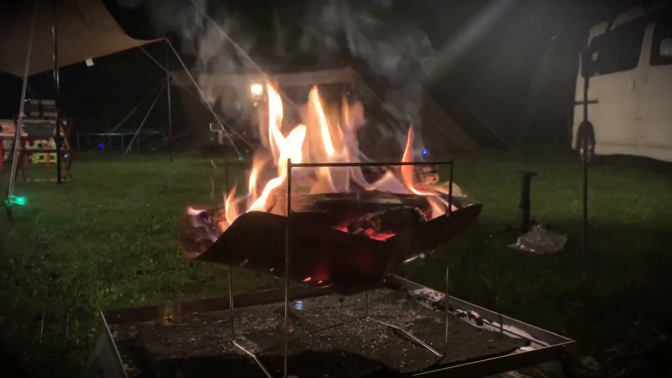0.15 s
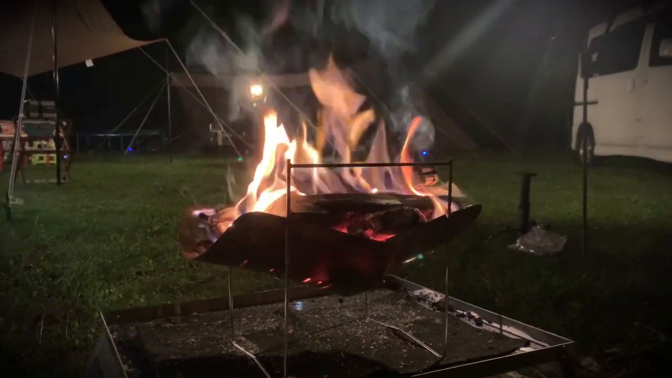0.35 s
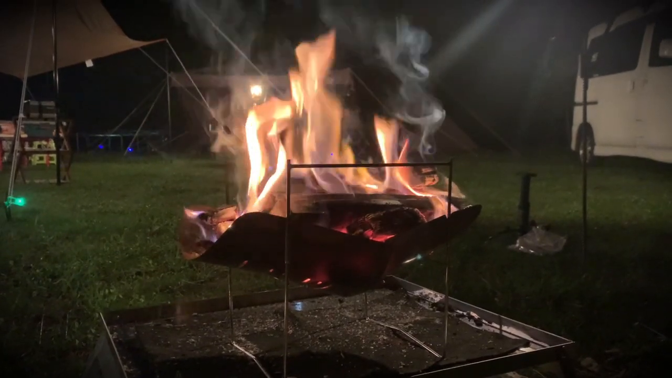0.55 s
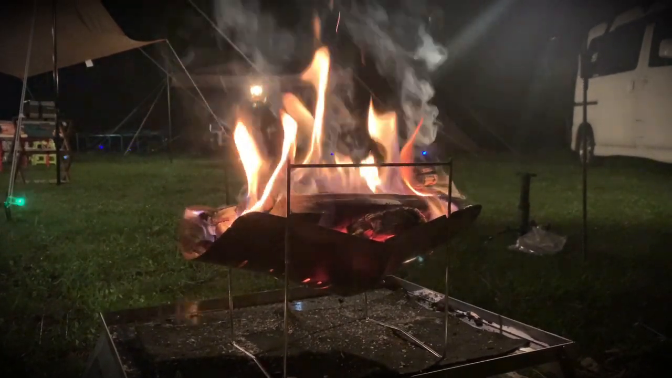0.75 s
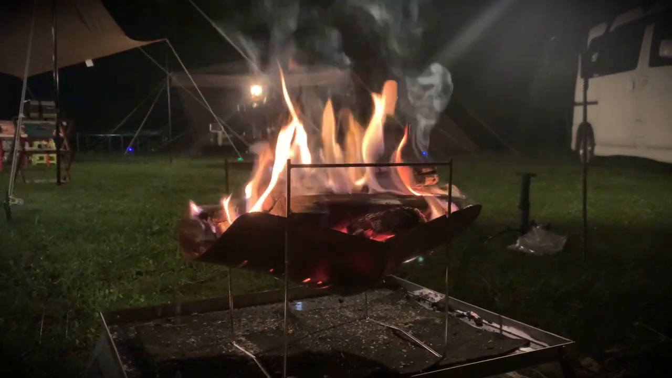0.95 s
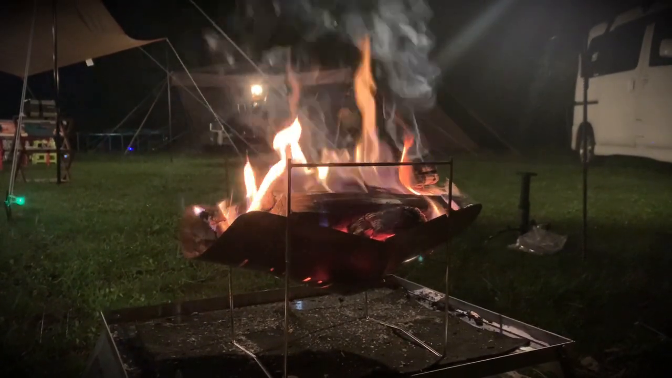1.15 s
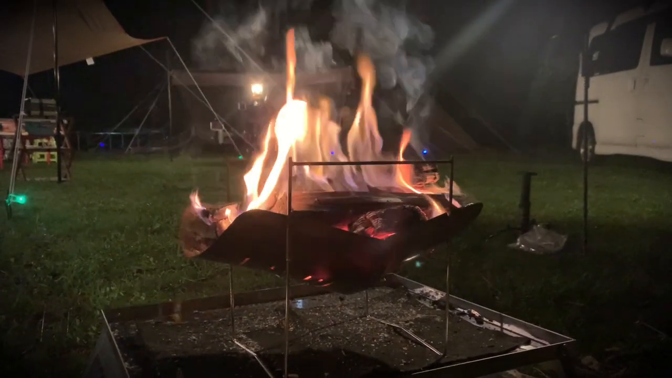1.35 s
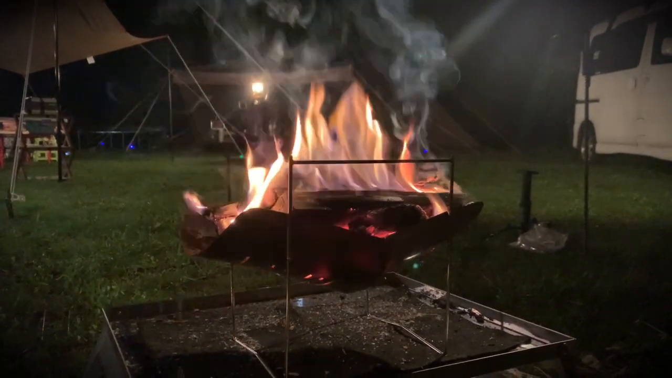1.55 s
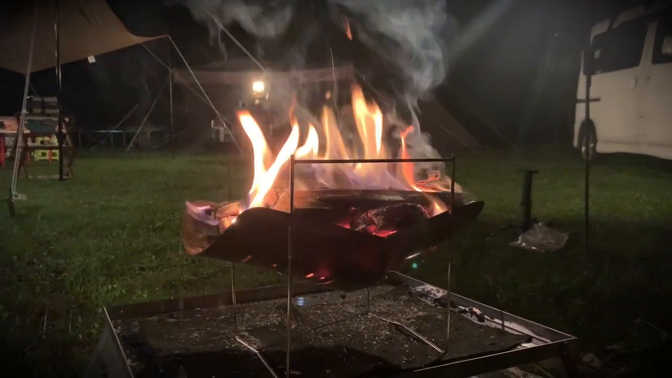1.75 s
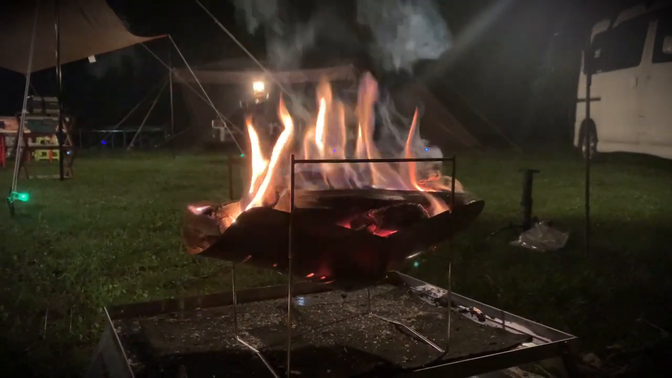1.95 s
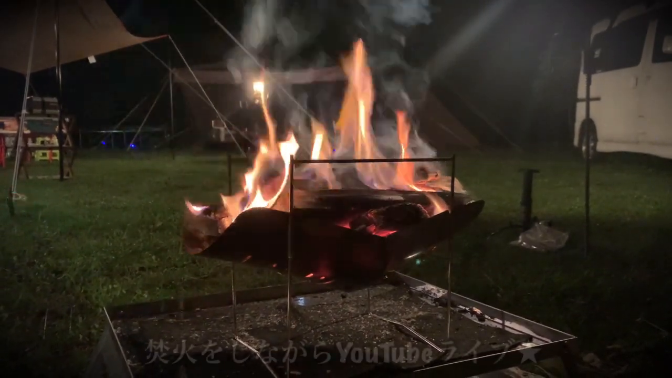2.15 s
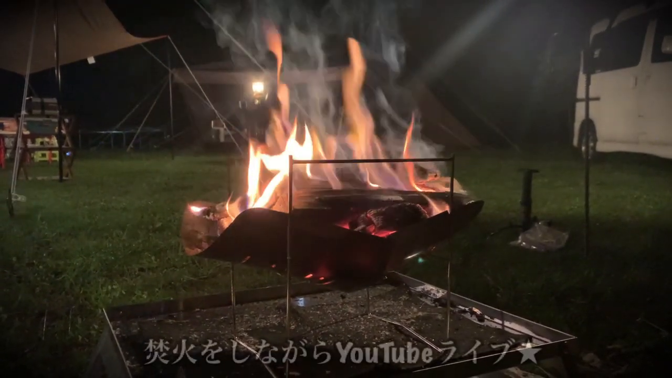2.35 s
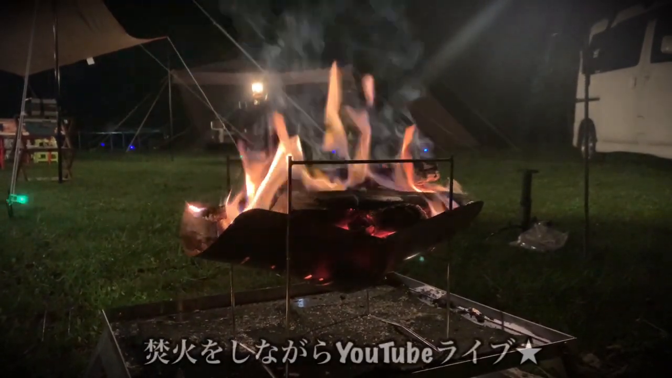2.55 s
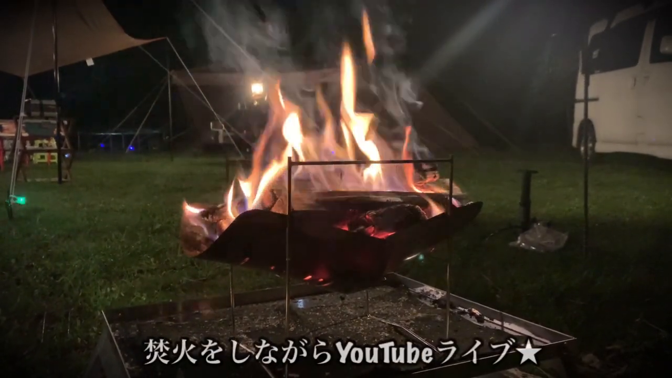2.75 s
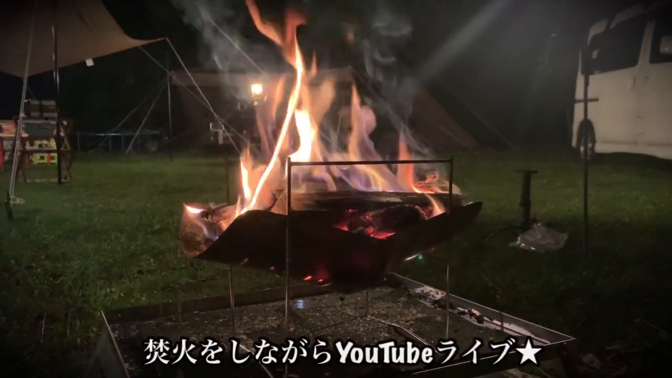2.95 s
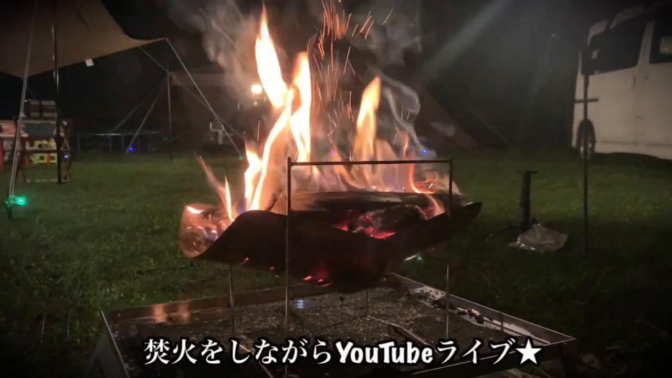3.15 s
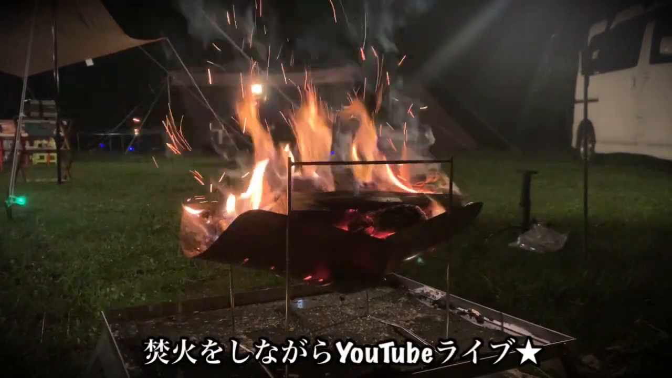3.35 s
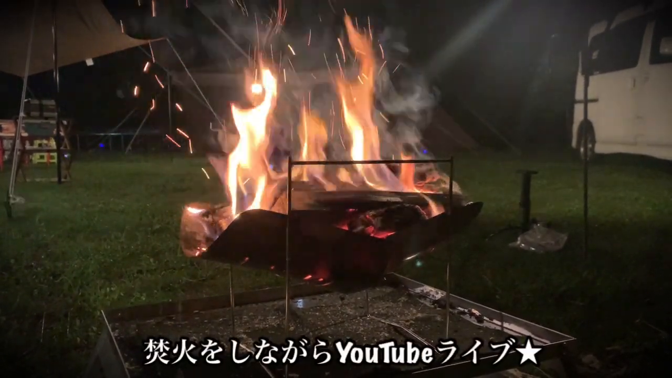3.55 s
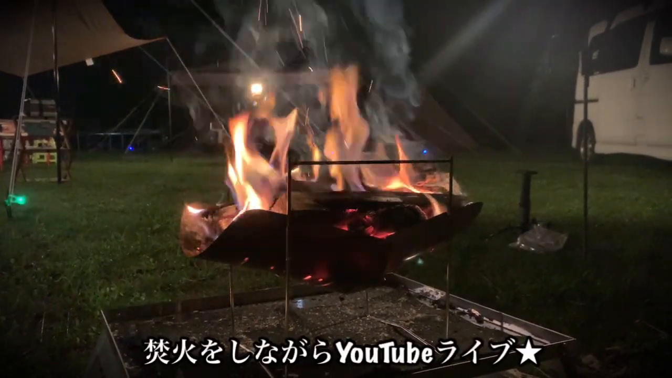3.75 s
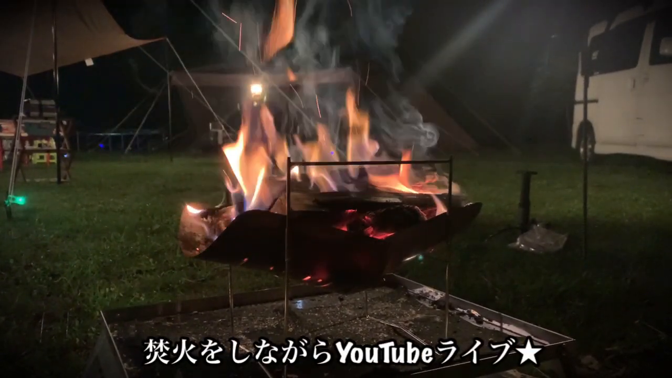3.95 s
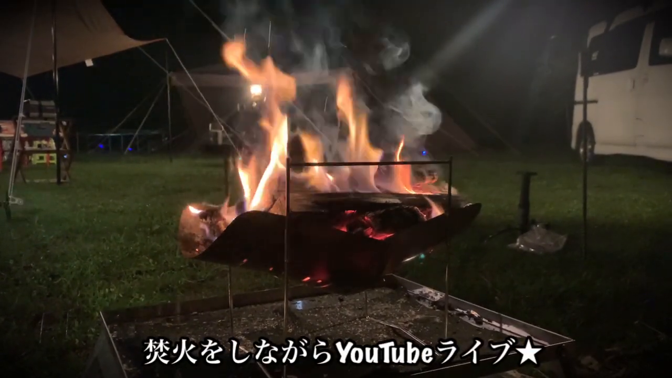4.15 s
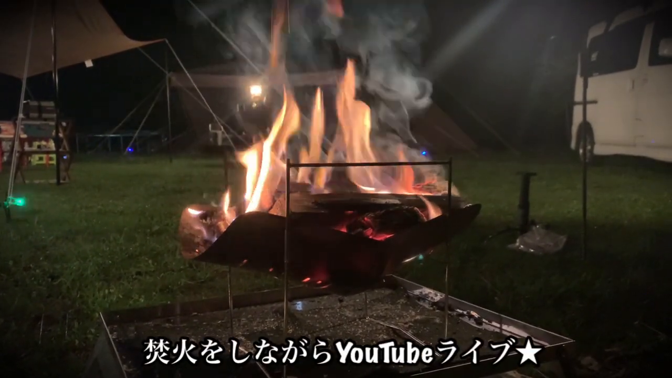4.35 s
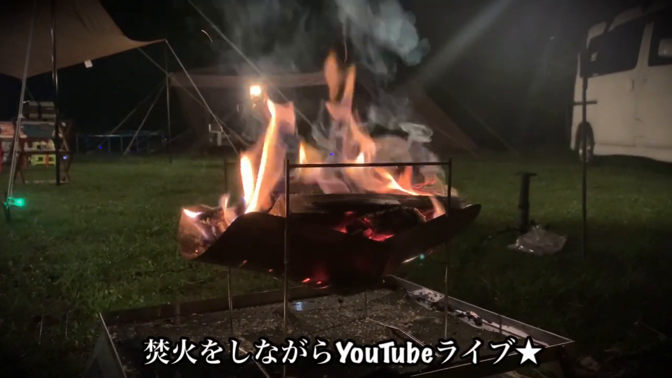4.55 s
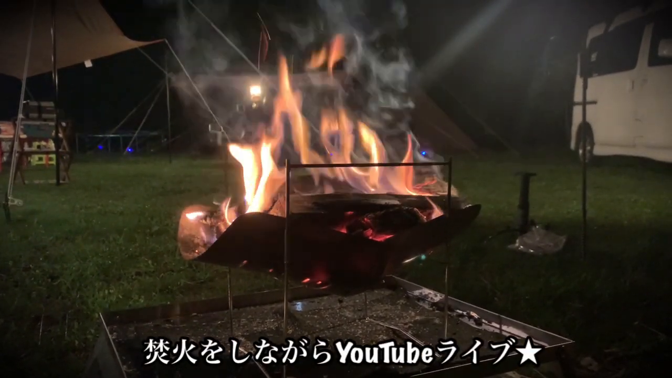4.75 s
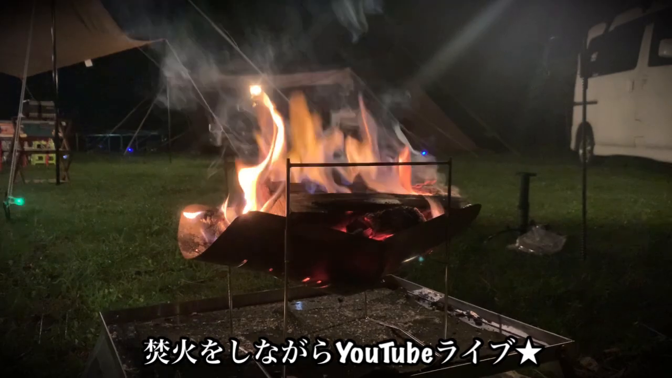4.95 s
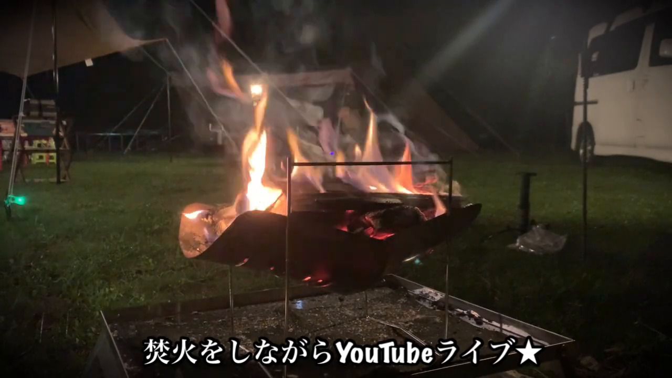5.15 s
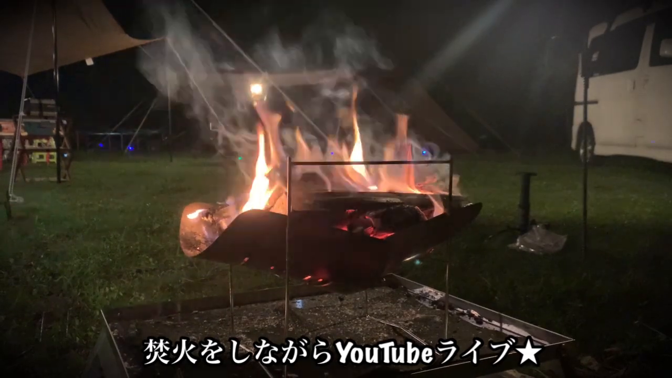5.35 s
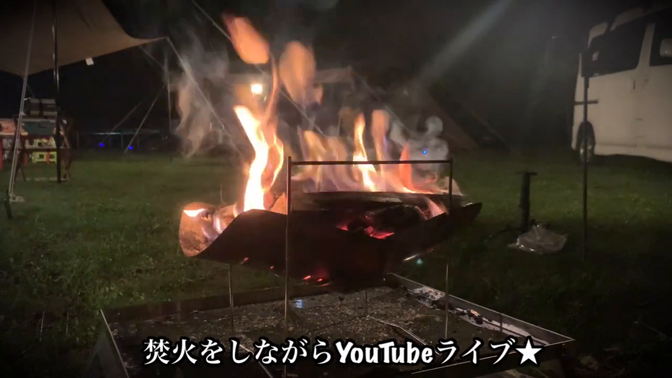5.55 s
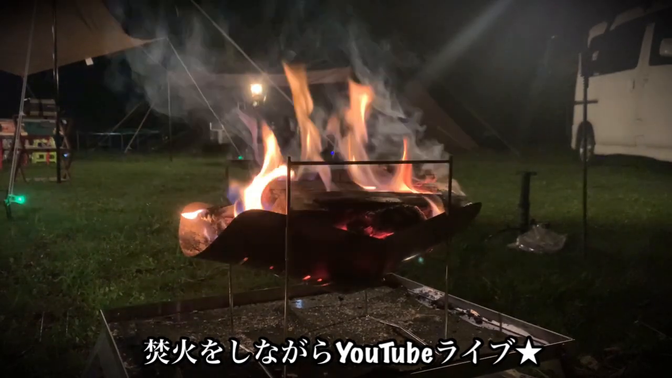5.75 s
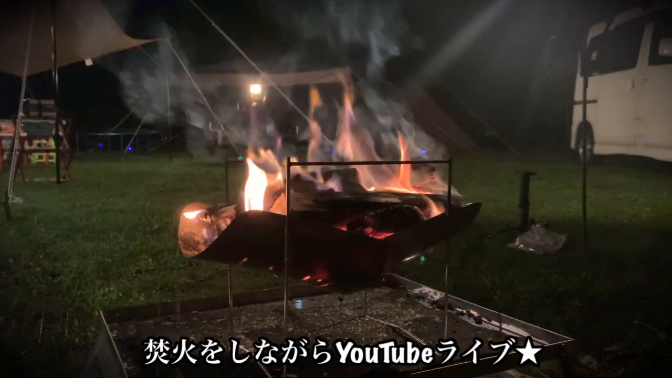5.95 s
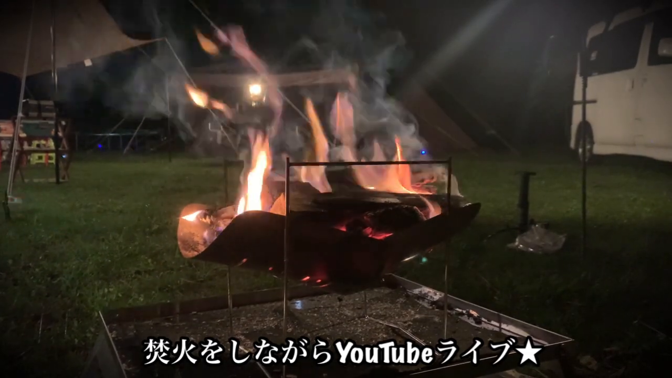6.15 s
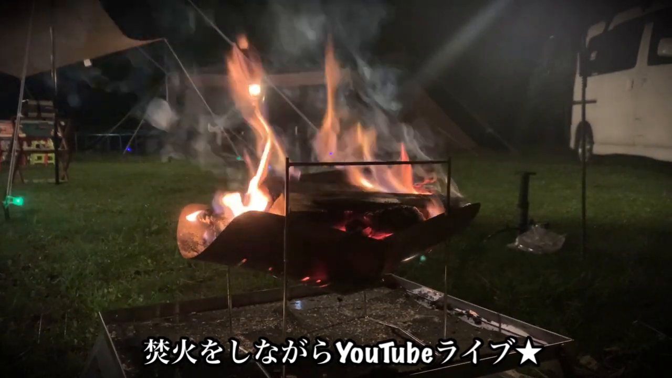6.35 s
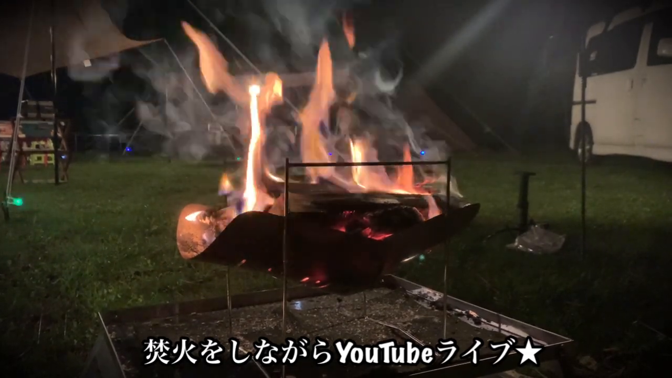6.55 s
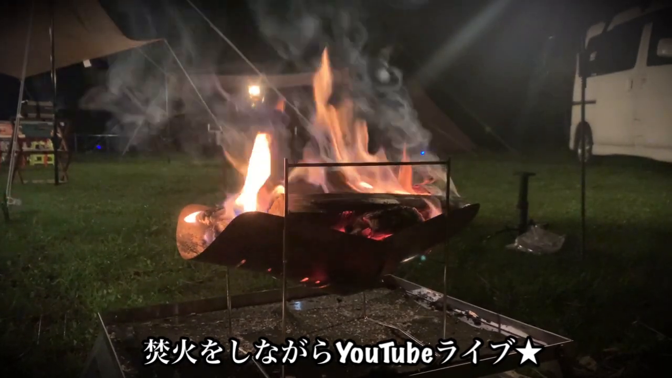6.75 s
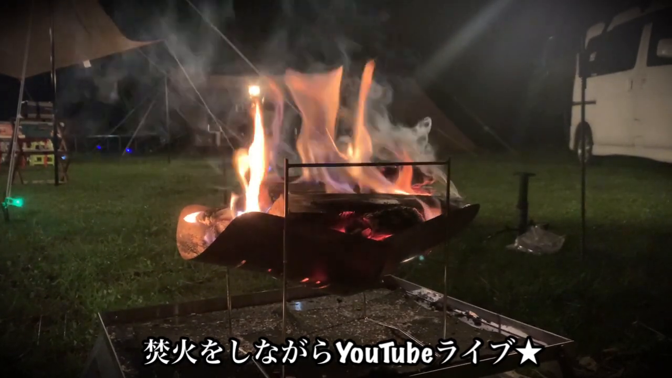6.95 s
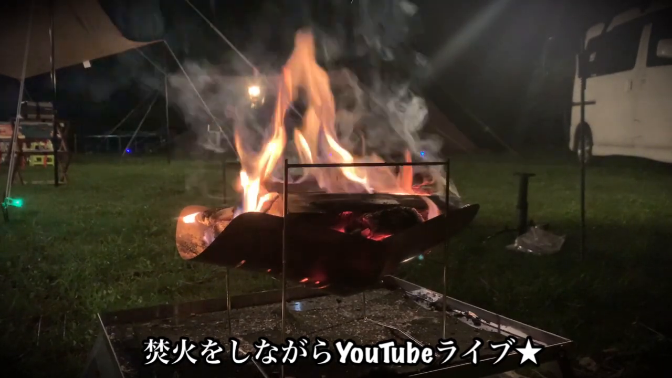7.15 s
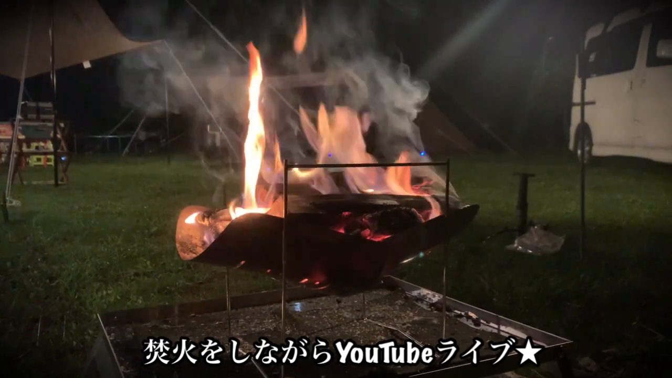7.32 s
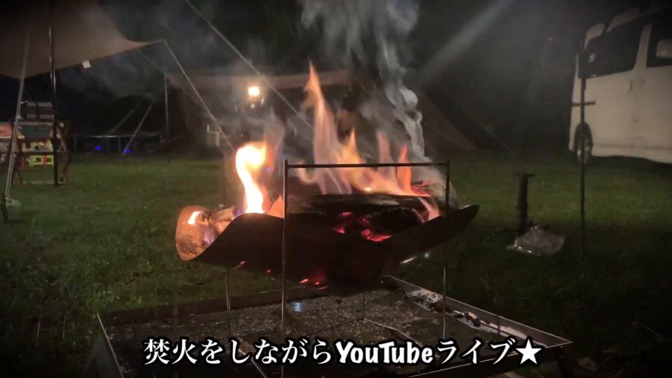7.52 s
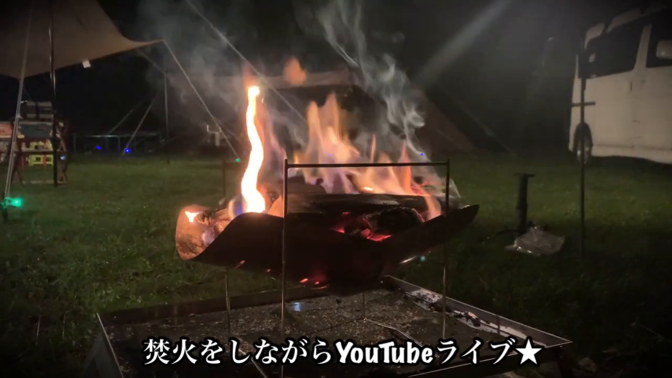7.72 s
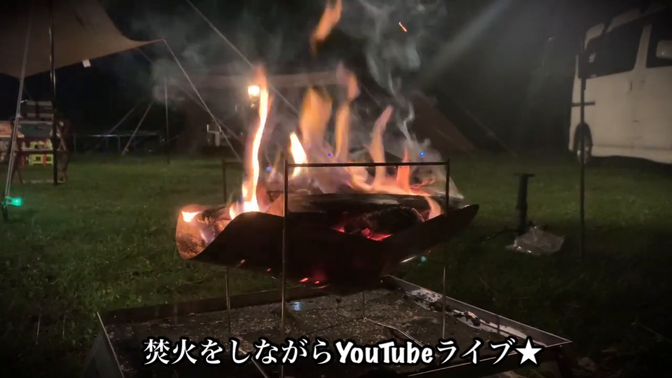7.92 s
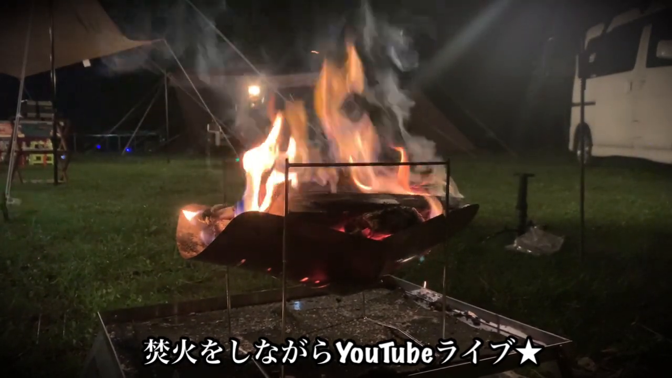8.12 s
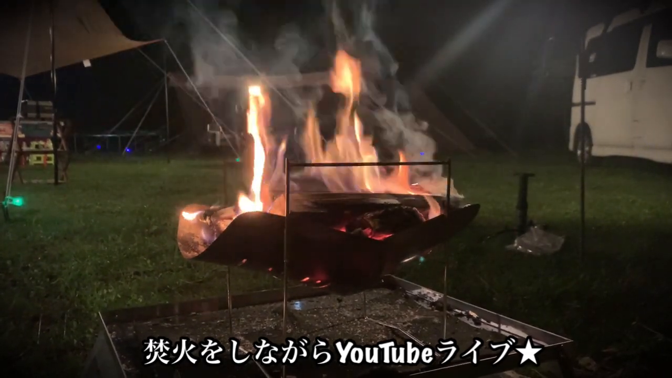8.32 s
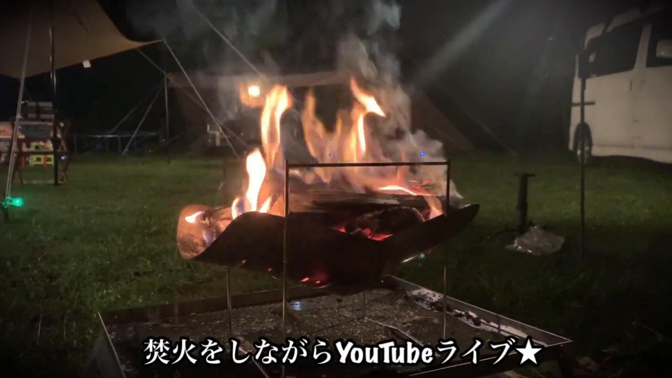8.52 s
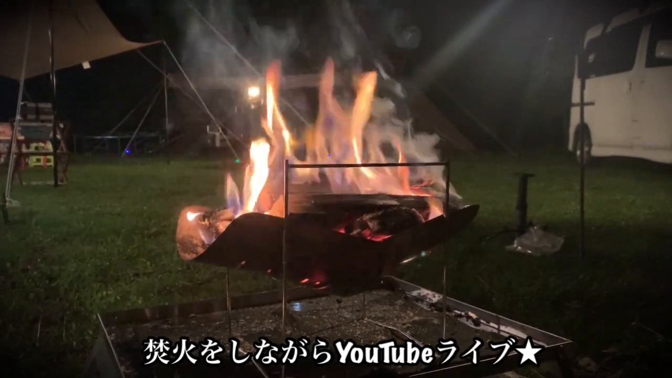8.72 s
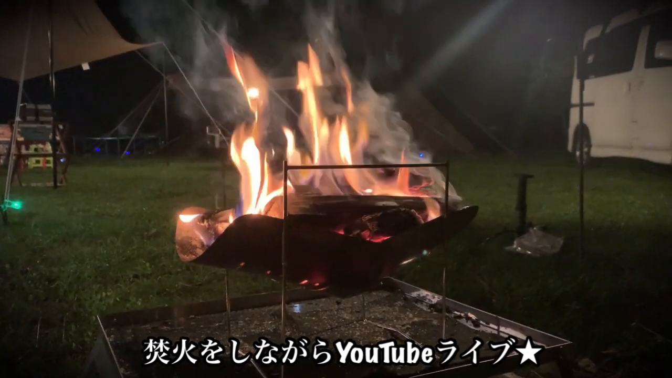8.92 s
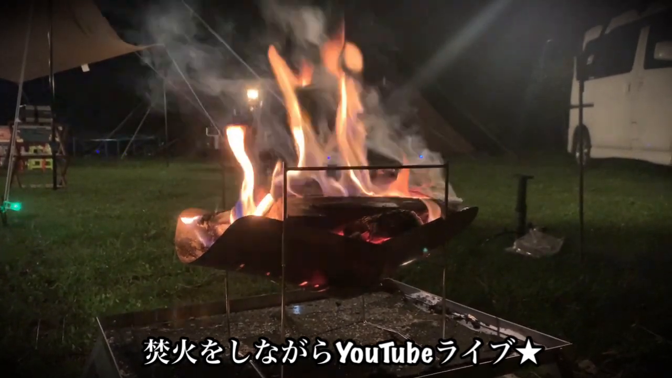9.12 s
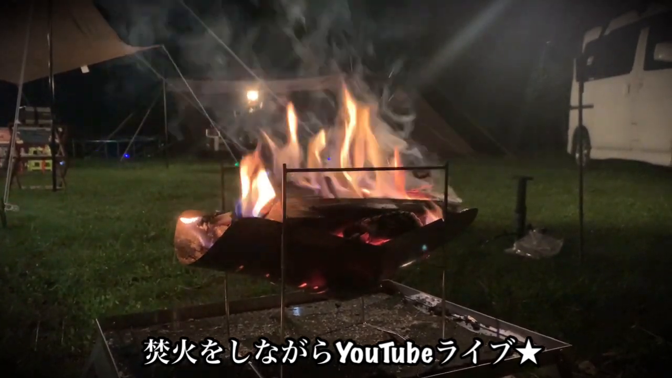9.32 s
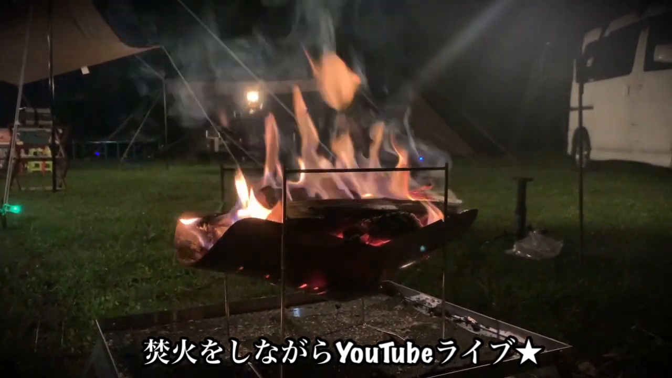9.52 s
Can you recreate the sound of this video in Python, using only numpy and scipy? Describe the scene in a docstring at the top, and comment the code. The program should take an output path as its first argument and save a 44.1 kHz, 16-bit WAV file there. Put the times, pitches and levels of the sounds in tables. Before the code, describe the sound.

A wood fire in a sheet-metal pan on open grass, heard close in stereo. Soft lumpy low roar and fluttering hiss run throughout under fine irregular ticks. Strong cracks gather in the first two seconds, then sap hisses and a log bursts with a distorted bang at about three seconds. The sound briefly dips and recovers, then calmer crackling continues with occasional knocks and snaps.

```python
"""A wood fire in a sheet-metal pan on grass at night, heard from close by through a two-port microphone.
Flames roar softly as low, lumpy noise; gas and sap hiss out of the logs as bands of higher noise.
Pockets in the wood pop: sharp cracks with echoes and a spray of noise, among faint ticks, dull pops and
puffs of band noise. Thumps, knocks and short rings are damped swings, with big bursts or alone.
One log tears open as swelling noise, then bursts and overloads the input."""
import sys
import numpy as np
from scipy import signal
from scipy.fft import rfft, irfft
from scipy.io import wavfile

SR = 44100
rng = np.random.default_rng(int(sys.argv[2]) if len(sys.argv) > 2 else 0)


def waveform_to_disk(signal):
    """Save audio, clipped to [-1, 1], as 16-bit WAV at the path in sys.argv[1]."""
    frames = np.transpose(np.atleast_2d(signal))
    scaled = np.clip(frames, -1, 1) * 32767
    samples = np.round(scaled).astype(np.int16)
    wavfile.write(sys.argv[1], SR, samples)


N = 426888


def from_db(db):
    """Decibels to gain: 20 dB is ten times the amplitude."""
    return 10 ** (np.asarray(db) / 20)


def rms_one(x):
    """Scale a sound to an rms of 1, counted over all its channels together."""
    return x / np.sqrt(np.mean(x ** 2) + 1e-20)


def in_time(rows):
    """Join the points of a (time, value) table with straight lines, one value a sample."""
    times, values = np.transpose(rows)
    return np.interp(np.arange(N) / SR, times, values)


def at_hz(points, hz):
    """Read a (frequency, value) table on a log frequency axis."""
    table_hz, values = np.transpose(points)
    return np.interp(np.log(hz + 1), np.log(table_hz), values)


def smooth(x, time_s):
    """Even out a signal with two equal running averages that forget exponentially."""
    keep = np.exp(-1 / (time_s * SR))
    return signal.lfilter([(1 - keep) ** 2], [1, -2 * keep, keep * keep], x)


def drift(rate_hz):
    """Random wandering around 0 with spread 1, made from smoothed noise; a higher rate wanders faster."""
    hop = 40   # samples between the points of the slow curve
    keep = np.exp(-2 * np.pi * rate_hz * hop / SR)
    noise = rng.standard_normal(N // hop + 2002)
    slow = signal.lfilter([1], [1, -2 * keep, keep * keep], noise)[2000:]   # skip the filter's start
    return np.interp(np.arange(N) / hop, np.arange(len(slow)), rms_one(slow))


def coloured(spectrum, channels):
    """Noise of rms 1 that follows a (frequency, dB) table and is silent outside it."""
    hz = np.fft.rfftfreq(N, 1 / SR)
    inside = (hz > spectrum[0][0]) * (hz < spectrum[-1][0])
    shape = from_db(at_hz(spectrum, hz)) * inside
    return rms_one(irfft(rfft(rng.standard_normal((channels, N))) * shape, N))


def bandpass(x, low_hz, high_hz, order=2):
    """Keep the band between two frequencies."""
    return signal.sosfilt(signal.butter(order, [low_hz, high_hz], "band", fs=SR, output="sos"), x)


def resonance(x, hz, width_hz):
    """Ring at one frequency, with about gain 1 at the peak; a narrow width rings longer."""
    r = np.exp(-np.pi * width_hz / SR)
    rise = np.array([1, 0, -1]) * (1 - r * r) / 2
    return signal.lfilter(rise, [1, -2 * r * np.cos(2 * np.pi * hz / SR), r * r], x)


def ports(x, lag_s=0.00035):
    """Carry a source to two ports: the right port hears the treble early and the rest late."""
    split_hz, lead_s, late_db = 8150, 0.0002998, -0.7
    left, right = np.broadcast_to(x, (2, N))
    hz = np.fft.rfftfreq(N, 1 / SR)
    # crossfade angle: 0 in the bass, a quarter turn in the treble
    angle = np.arctan(np.exp(np.clip((hz - split_hz) / 250, -30, 30)))
    early = np.sin(angle) * np.exp(2j * np.pi * hz * lead_s)
    late = from_db(late_db) * np.cos(angle) * np.exp(-2j * np.pi * hz * lag_s)
    return np.array([left, irfft(rfft(right) * (early + late), N)])


def roar():
    """Turbulent flames: lumpy noise, alike at both ports in the bass and less alike above."""
    # colour of the roar, level per Hz: (f/Hz, level/dB)
    flame_spectrum = [(15, -47), (25, -17.5), (52, -2), (70, 0), (174, -4), (212, -9.5), (259, -7.5),
                      (305, -15.5), (454, -18), (741, -13), (1140, -32), (1350, -21.5), (1900, -30.5),
                      (2470, -56), (4180, -120)]
    # likeness of left and right: (f/Hz, shared part of the power, 0 to 1)
    flame_likeness = [(60, 0.97), (250, 1), (500, 1), (900, 0.12), (1500, 0.42)]
    # strength of the flames before their lumpiness: (t/s, level/dB)
    flame_level = [(0, -43), (.8, -42), (1.3, -44), (2.6, -41.5), (3.2, -41.5), (3.7, -42.5), (4.34, -42),
                   (4.7, -44.5), (5.3, -43), (6.1, -43), (6.6, -43.5), (7.3, -43), (8.3, -43.5),
                   (8.7, -42.5), (9.2, -44), (9.68, -44.5)]
    shared = ports(coloured(flame_spectrum, channels=1)[0])
    own = coloured(flame_spectrum, channels=2)
    alike = at_hz(flame_likeness, np.fft.rfftfreq(N, 1 / SR))
    flames = irfft(np.sqrt(alike) * rfft(shared) + np.sqrt(1 - alike) * rfft(own), N)
    lumps_db = 1.3 * drift(8.7) + 0.8 * drift(3)
    balance_db = [[-0.7], [0.7]]   # evens out the ports
    return from_db(in_time(flame_level) + lumps_db) * flames * from_db(balance_db)


def hisses():
    """Gas leaves the wood: a wide hiss from all over, a sizzle from one spot, a breathy whistle of sap."""
    # colour of the wide hiss, level per Hz: (f/Hz, level/dB)
    hiss_spectrum = [(1590, -36), (2700, -17), (2980, -10.5), (3410, 0), (3910, -5), (4320, 1),
                     (4800, -6.5), (5270, -3), (5830, -12), (7280, -6.5), (8400, -13), (10900, -61),
                     (18500, -120)]
    # colour of the sizzle, level per Hz: (f/Hz, level/dB)
    sizzle_spectrum = [(7800, -34), (8400, -3), (9200, -3), (10000, 3), (12500, 3.5), (15600, 0.5),
                       (16000, -42)]
    # sap steaming from a crack, before its flutter: (t/s, level/dB)
    sap_level = [(0.0, -60), (1.7, -57.5), (1.9, -53.5), (2.45, -61), (2.6, -49.5), (2.8, -49),
                 (3.0, -49.5), (3.12, -42.5), (3.2, -46.5), (3.29, -46.5), (3.38, -52), (3.46, -56.5),
                 (4.66, -60), (5.05, -54), (5.28, -53.5), (5.65, -57.5), (6.6, -61), (8.6, -58.5),
                 (9.68, -59.5)]
    hiss_db, sizzle_db = -48, -53   # before the flutter
    sap_hz, sap_width_hz = 2335, 294
    under_hz, under_width_hz = 1850, 460

    flutter = drift(8.6)   # hiss and sizzle share it
    wide = from_db(hiss_db + 0.89 * flutter) * coloured(hiss_spectrum, channels=2)
    spot = ports(coloured(sizzle_spectrum, channels=1)[0])
    own = coloured(sizzle_spectrum, channels=2)
    sizzle = from_db(sizzle_db + 0.29 * flutter) * (spot + 0.11 * own)

    air = rng.standard_normal((3, N))
    under = resonance(resonance(air, under_hz, under_width_hz), under_hz, under_width_hz)
    under = from_db(-9 + 3.3 * drift(7.6)) * under   # the lower tone comes and goes
    whistle = resonance(resonance(air, sap_hz, sap_width_hz), sap_hz, sap_width_hz)
    jets = rms_one(whistle - under)
    breath_db = in_time(sap_level) + 1.5 * drift(7.6) + 0.46 * drift(16)
    sap = from_db(breath_db) * (0.83 * ports(jets[0]) + 0.52 * jets[1:])
    return wide + sizzle + sap


def ticks():
    """Faint random ticks of cracking charcoal: bright, very short noises of very uneven size."""
    per_s = 14   # typical rate; the ticks come thicker and thinner
    base_db = -47   # smallest size, before the noise and its band
    born = rng.random(N) < per_s * from_db(4 * drift(1.5)) / SR
    size_db = base_db + 5.1 * np.minimum(rng.exponential(1, N), 3.0)
    sizes = from_db(size_db) * rng.choice([-1, 1], N)
    fade = signal.lfilter([1], [1, -0.97], born * sizes + 1e-18)   # each tick fades in about a millisecond
    return bandpass(fade * rng.standard_normal(N), 2500, 14000)


def pops():
    """Each gas pocket gives one sharp crack, its echoes and a dying spray of splinters, coloured by band."""
    # gas pockets bursting: (t/s, level/dB, brightness/dB per colour step,
    # scoop/dB: ends of the spectrum up and middle down, woody body/dB against the level,
    # splinter spray/dB against the crack)
    pop_table = [(0.1356, -39, 1, 0.5, -19.4, -17), (0.368, -35, 2.3, -1.5, -15, -19),
                 (0.4812, -51, 1.3, 2.1, -3, -22), (0.7074, -50, 3, -0.1, -8.4, -22),
                 (0.8616, -24.5, -0.6, -3.5, -12.5, -22.5), (0.9517, -46, -0.1, -0.1, -12, -22),
                 (1.0002, -23.5, -0.5, 0, -8.5, -23), (1.031, -48.8, 2.2, -5, -4.8, -22),
                 (1.2369, -42, 1.5, -5, -9.1, -19), (1.2634, -45, 3.5, -3, -5, -22),
                 (1.3891, -39, -1.5, -2.5, -16, -24), (1.5266, -32.5, 0.2, 1.0, -17, -20.5),
                 (1.6884, -31, -2, -0.8, -17, -24), (1.728, -13.5, -2.5, -1, -6.5, -21),
                 (1.9406, -16.3, -2.2, -0.4, -10.5, -20), (2.0272, -27.4, 0, -0.4, -9, -18),
                 (2.3586, -45.5, -2.5, -5, -12.0, -20), (3.0717, -18, -4.5, 2.5, 9.5, -24),
                 (3.5322, -28, 0.5, 4.5, -19, -22.5), (3.7156, -38.5, 0.2, 1, -3, -22),
                 (3.8302, -34, -0.6, -1.2, -7, -21), (4.0153, -46.5, 1.5, 0, -5, -22),
                 (4.0972, -44.0, 2.0, -2, -13.7, -22), (4.181, -45.5, 5, 3, -11, -26),
                 (4.3235, -50.1, 4.5, 0.8, 0, -24), (4.4622, -42, -1.5, 2.5, -1, -22),
                 (5.1829, -47.5, 3, 0.7, -11, -22), (5.2868, -47.5, 3.6, -4, -11.8, -22),
                 (5.7803, -41.5, -0.5, -1, -17, -21), (5.9892, -42.5, 2, -0.8, -16.8, -22),
                 (6.3778, -36, 4, -1.5, -18, -17), (6.4581, -49.6, -1.3, -1, -8.2, -20),
                 (6.5295, -43.5, 2.5, 1.5, -10.2, -20), (6.5394, -43.7, 2.9, -1.0, -12.4, -22),
                 (7.185, -27.5, -7, 2.5, 5.5, -23), (7.5146, -51.5, 5, -3, -6, -22),
                 (7.6095, -37, 4, -2.5, -14, -16), (7.8772, -45.5, -0.3, -3, -8, -22),
                 (7.9238, -51, 6, 0, -2, -22), (8.2512, -44, 2.9, -1, -14.1, -13),
                 (8.5089, -50, -2, -0.2, -8.5, -22), (8.8806, -38.5, 3.5, -1, -18.4, -21),
                 (9.0599, -47.5, 1, 1.3, -11.1, -24), (9.1545, -46, -1, -3.4, -13.2, -22),
                 (9.4029, -44.0, 2.1, 0, -10, -22), (9.4177, -32, -0.2, 3, -10.1, -23),
                 (9.4911, -49, 2, -2.0, -0.3, -22), (9.6593, -46.5, 0, -3, -10.9, -24)]
    # bands above the body: (low f/Hz, high f/Hz, share of the spray's t60, level/dB, dark-to-bright step)
    pop_bands = [(1370, 4200, 1.7, -0.93, -1.41), (3980, 9080, 2.04, 0.7, -0.63),
                 (8640, 11370, 0.23, 1.3, 0.67), (11730, 16200, 0.96, 0.5, 1.5)]
    # woody body under a pop: (low f/Hz, high f/Hz, share of the spray's t60)
    body_band = (200, 1020, 2.08)
    # echoes from the pan walls and the ground, before they shift: (delay/s, level/dB)
    echo_table = [(.0009, -3), (.0017, -5.5), (.0022, -23.5), (.0032, -24)]
    # ringing of the pan: (f/Hz, width/Hz, level/dB)
    pan_tones = [(1790, 360, -6), (2250, 460, 8.5), (3370, 230, 9.5)]
    spray_likeness = 0.18   # part of the spray's power shared by both ports
    spray_rise_s = 0.00044   # splinters swell just after the crack
    spray_t60_s, spray_shortens = 0.019, 0.1   # at -20 dB; dB of length lost per dB of level
    scoop_pivot = 1.2   # squared step at which the scoop changes sign

    count, size = len(pop_table), 2048
    age = np.arange(size) / SR
    cracks = np.zeros((count, size))
    cracks[:, 0] = 1
    place = rng.uniform(-1.2, 1, (count, 2 * len(echo_table)))   # echoes shift with the spot that pops
    for k, (delay_s, echo_db) in enumerate(echo_table):
        at = (delay_s * SR * (1 + 0.18 * place[:, 2 * k])).astype(int)
        cracks[np.arange(count), at] += from_db(echo_db + 2.1 * place[:, 2 * k + 1])

    spray = rng.standard_normal((count, 3, size))
    spray = np.sqrt(spray_likeness) * spray[:, :1] + np.sqrt(1 - spray_likeness) * spray[:, 1:]
    edges = [body_band[:2]] + [band[:2] for band in pop_bands]
    shares = [body_band[2]] + [band[2] for band in pop_bands]
    out = np.zeros((2, N + 2 * size))
    for row, crack, noise in zip(pop_table, cracks, spray):
        t, level_db, bright_db, scoop_db, body_db, spray_db = row
        start = round(t * SR)
        t60 = spray_t60_s * from_db(-spray_shortens * (level_db + 20))   # louder pops die sooner
        colour = [body_db]
        for *_, db, step in pop_bands:
            colour.append(db + bright_db * step + scoop_db * (step ** 2 - scoop_pivot))
        for k, ((low_hz, high_hz), share, db) in enumerate(zip(edges, shares, colour)):
            fade_db = spray_db - 60 * age / max(t60 * share, 0.004)
            burst = crack + (1 - np.exp(-age / spray_rise_s)) * from_db(fade_db) * noise
            if k == 1:   # the pan rings in the first band above the body
                ring = sum(from_db(ring_db) * resonance(burst, hz, width) for hz, width, ring_db in pan_tones)
                burst = 1.5 * burst + ring
            part = bandpass(burst, low_hz, high_hz, order=3)
            part = part / np.sqrt(np.mean(part[:, :size // 8] ** 2))   # level counts over the first 6 ms
            out[:, start:start + size] += from_db(level_db + db) * part
    return out[:, :N]


def puffs():
    """Soft ticks, dull pops and puffs of steam: sputtering band noise, short or held."""
    # soft ticks, dull pops and puffs, level before the sputter:
    # (t/s, level/dB, low f/Hz, high f/Hz, rise/s, held/s, t60/s)
    puff_table = [(.253, -42, 700, 2600, .001, .002, .04), (1.85, -43, 1390, 2600, 0.0039, 0.012, 0.1),
                  (2.58, -53, 7800, 10000, .02, 0.055, .3), (3.108, -42.5, 3000, 8700, 0.001, 0.006, 0.04),
                  (5.919, -48, 700, 2200, .001, .002, .04), (3.24, -49, 1900, 3000, 0.04, 0.14, 0.2),
                  (4.25, -35.5, 1480, 3000, 0.00046, 0.0017, 0.023),
                  (6.307, -38, 1400, 4400, .001, .002, .04), (6.361, -36.5, 1400, 4400, .001, .002, .04),
                  (6.293, -46, 1500, 3200, 0.0063, 0.014, 0.26), (7.3, -49.5, 1500, 3000, .01, 0.019, 0.29),
                  (8.9035, -27.5, 2520, 6740, 0.00093, .003, 0.059),
                  (8.905, -46, 2900, 6300, 0.0024, .26, 0.26), (8.907, -58, 5450, 5750, .003, 0.25, .2)]
    out, age = np.zeros((2, N + SR)), np.arange(SR // 2) / SR
    for t, level_db, low_hz, high_hz, rise_s, held_s, t60 in puff_table:
        start = round(t * SR)
        jet = bandpass(rng.standard_normal((2, len(age))), low_hz, high_hz)
        fade_db = level_db - 60 * np.maximum(age - held_s, 0) / t60
        shape = (1 - np.exp(-age / rise_s)) * from_db(fade_db)
        out[:, start:start + len(age)] += shape * rms_one(jet)
    return out[:, :N] * from_db(1.7 * drift(56))   # sputter


def thumps():
    """Thumps, hollow knocks and short rings, with big bursts or alone: damped swings, most sinking in pitch."""
    # low thumps, hollow knocks and short rings, level before build-up and fading:
    # (t/s, level/dB, start f/Hz, end pitch as share of start, t60/s)
    thump_table = [(1.728, -22, 179, 0.8, 0.049), (1.874, -32, 256, 1, 0.13), (1.942, -29, 200, 0.97, .04),
                   (3.0708, 2.5, 1850, 0.98, 0.017), (3.0717, 2.5, 300, 0.19, 0.033),
                   (3.0708, -8.5, 484, 1, 0.026), (3.641, -33.5, 900, 0.95, 0.026),
                   (4.2512, -29.5, 797, 0.93, 0.063), (4.253, -15, 314, 0.84, 0.021),
                   (5.63, -33.5, 262, 1, .08), (7.185, -19.5, 258, 0.47, 0.025),
                   (7.1852, -34, 2250, 1, 0.023), (7.1862, -18, 780, 0.9, 0.015)]
    out, age = np.zeros(N), np.arange(SR // 8) / SR
    for t, level_db, hz, end, t60 in thump_table:
        pitch = hz * (end + (1 - end) * np.exp(-age / 0.0052))
        swell = (1 - np.exp(-2.5 * hz * age)) * from_db(level_db - 60 * age / t60)   # builds in half a cycle
        out[round(t * SR):][:len(age)] -= np.sin(2 * np.pi * np.cumsum(pitch) / SR) * swell
    return out


def splitting():
    """A log tears open before it bursts: rough noise swells at a steady dB rate and stops at the burst."""
    start_s, end_s, end_db, swell_db_per_s = 3.05, 3.071, -12, 1250   # level before the roughness
    t = np.arange(N) / SR
    tearing = bandpass(rng.standard_normal((2, N)), 700, 7500)
    tearing = rms_one(tearing + tearing[0])   # partly alike at both ports
    swell = from_db(end_db - swell_db_per_s * np.maximum(end_s - t, 0))
    swell = swell * (t > start_s) * (t < end_s)
    return swell * tearing * from_db(3.8 * drift(220))


def scene():
    """Add the ticks, pops, puffs and thumps to the steady fire."""
    steady = roar() + hisses()
    sharp = ports(ticks() + pops())
    heavy = ports(thumps() + splitting(), lag_s=0.0001)
    return steady + sharp + puffs() + heavy


def record(dry):
    """The bass is cut, the input clips, gain control ducks slowly after loud bursts, the top is cut."""
    bass_cut_hz, top_stop_hz = 45, 16994   # from the second one up, at least 85 dB down
    knee_db, slope = -23.5, 0.88   # dB of ducking per dB above the knee
    power_s, lag_s, delay_s = 0.03, 0.018, 0.036
    bass_cut = signal.butter(2, bass_cut_hz, "high", fs=SR, output="sos")
    clipped = np.clip(signal.sosfilt(bass_cut, dry), -1, 1)
    power = smooth(np.mean(clipped ** 2, axis=0), power_s)
    over_db = np.maximum(10 * np.log10(power + 1e-12) - knee_db, 0)
    duck_db = smooth(-slope * over_db, lag_s)
    duck_db = np.pad(duck_db, (round(delay_s * SR), 0))[:N]   # the gain follows late
    top_cut = signal.cheby2(14, 85, top_stop_hz, fs=SR, output="sos")
    return signal.sosfilt(top_cut, clipped * from_db(duck_db))


dry = scene()
out = record(dry)
waveform_to_disk(out)
```